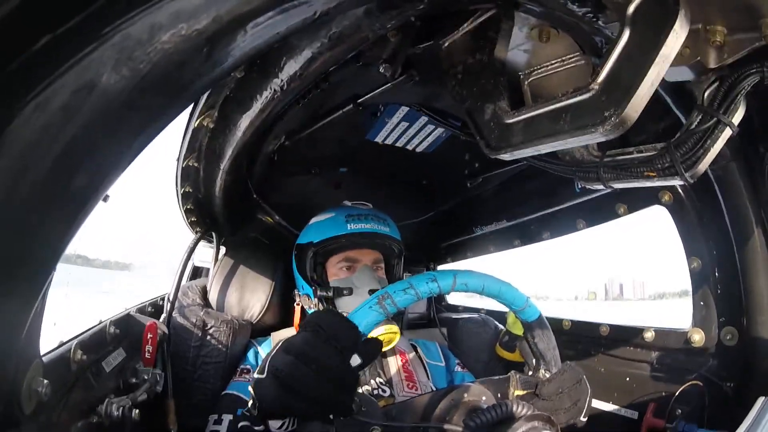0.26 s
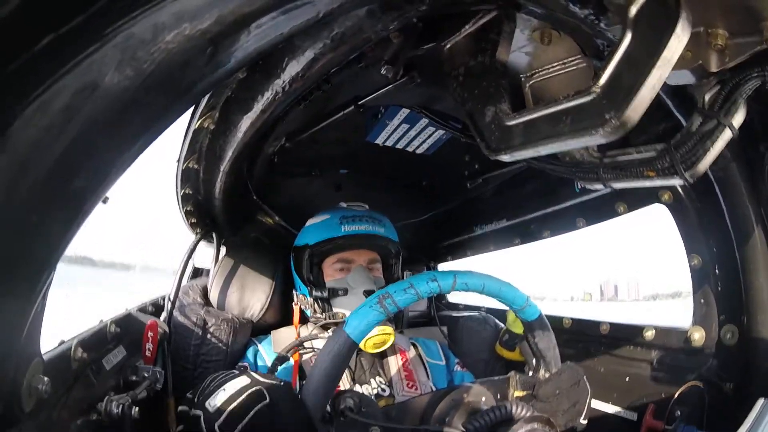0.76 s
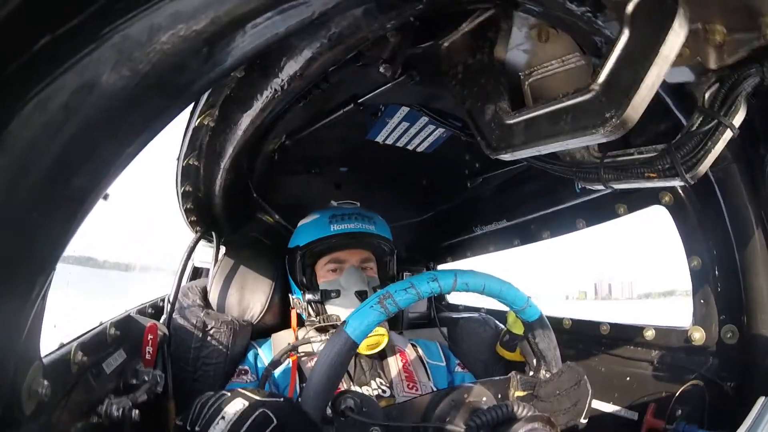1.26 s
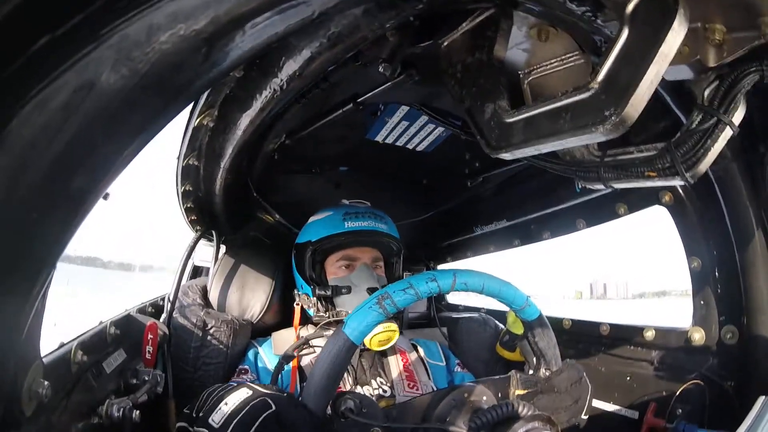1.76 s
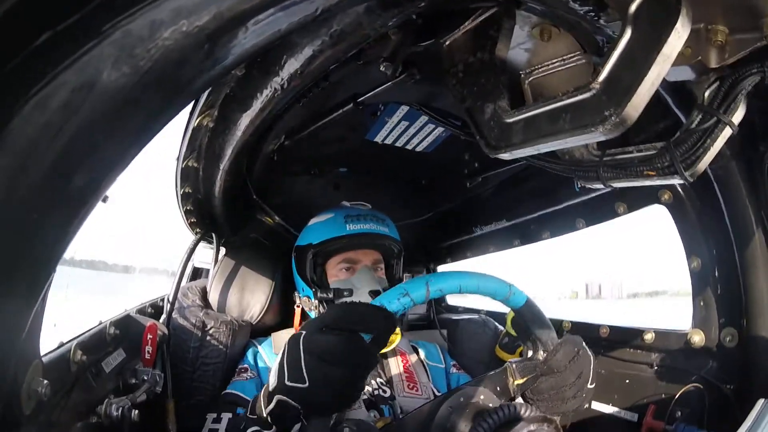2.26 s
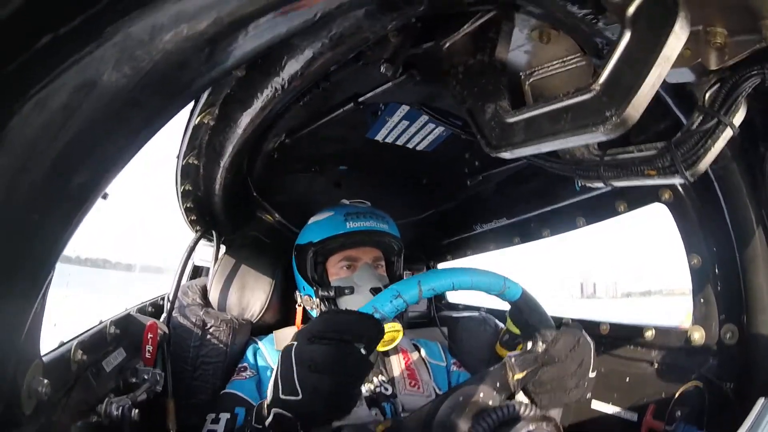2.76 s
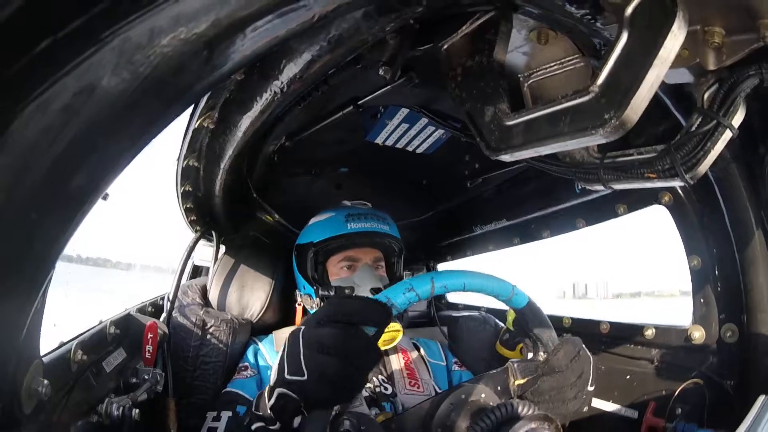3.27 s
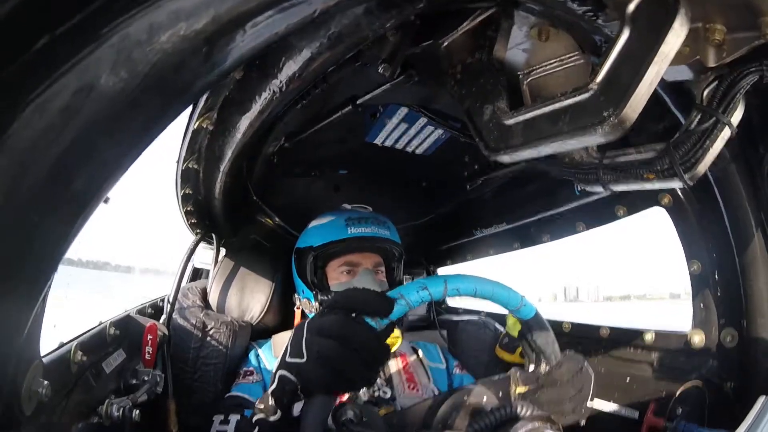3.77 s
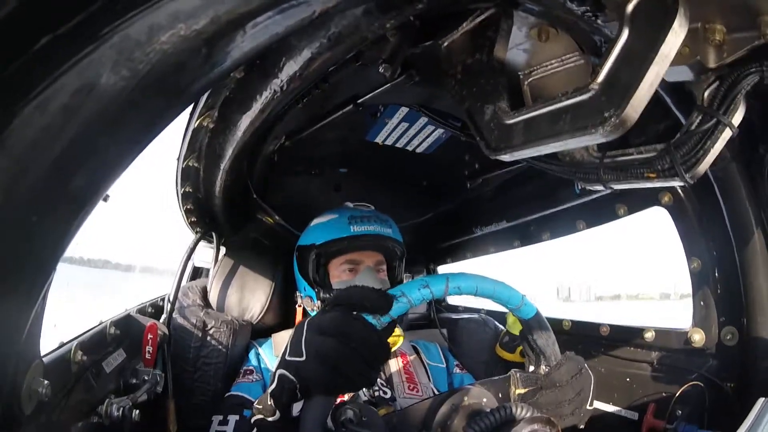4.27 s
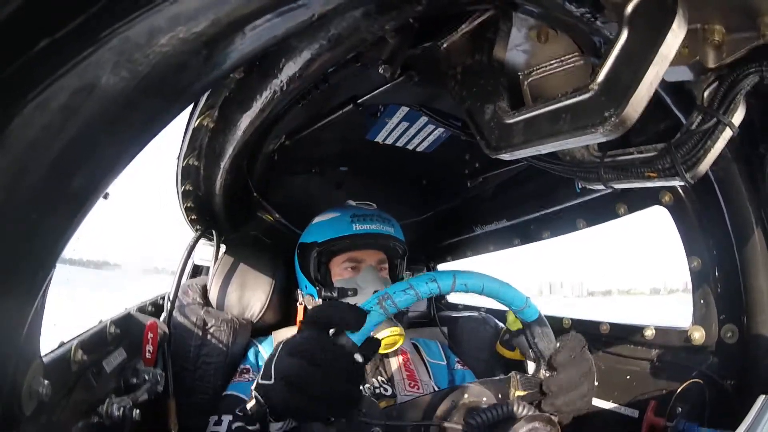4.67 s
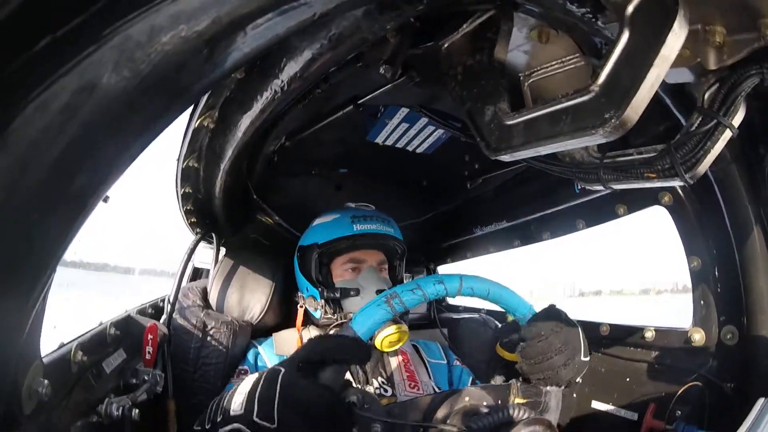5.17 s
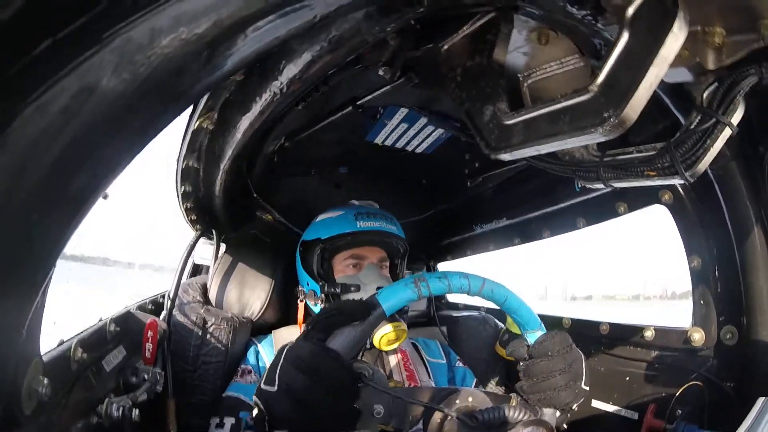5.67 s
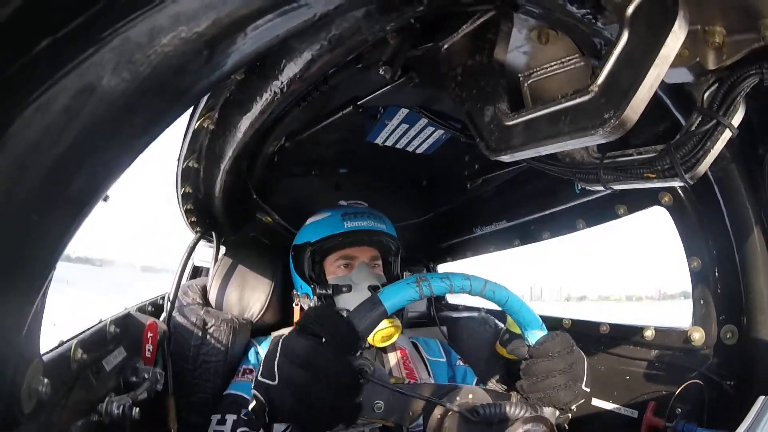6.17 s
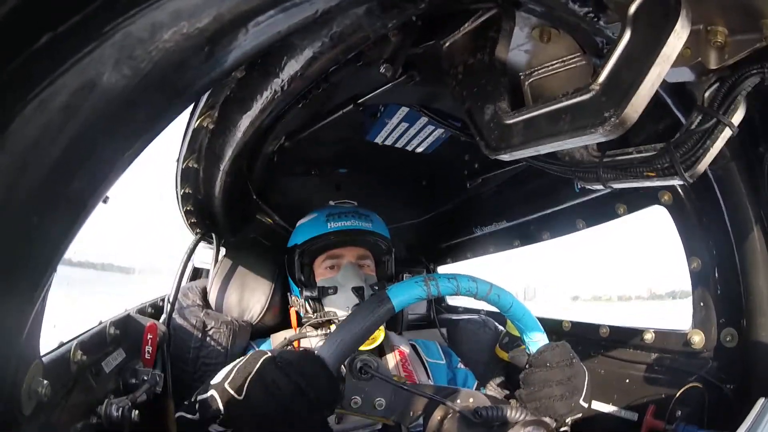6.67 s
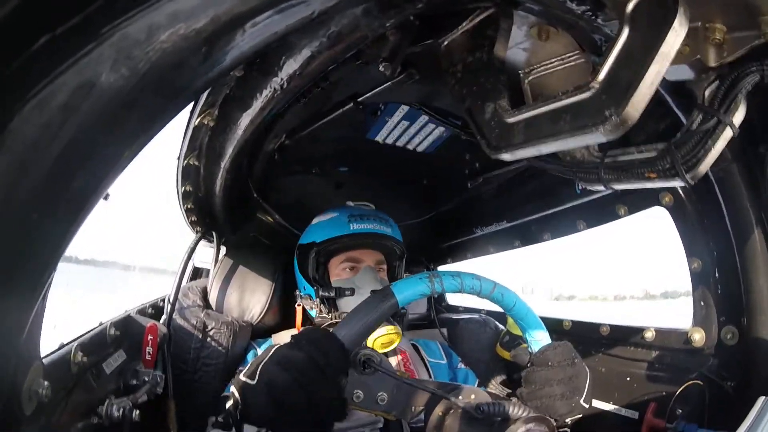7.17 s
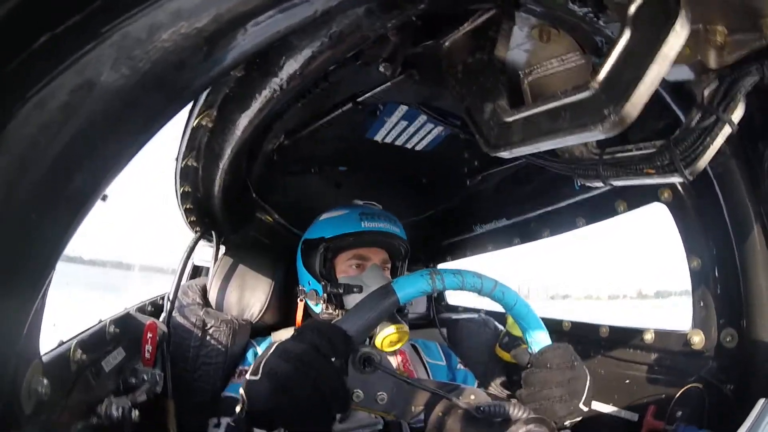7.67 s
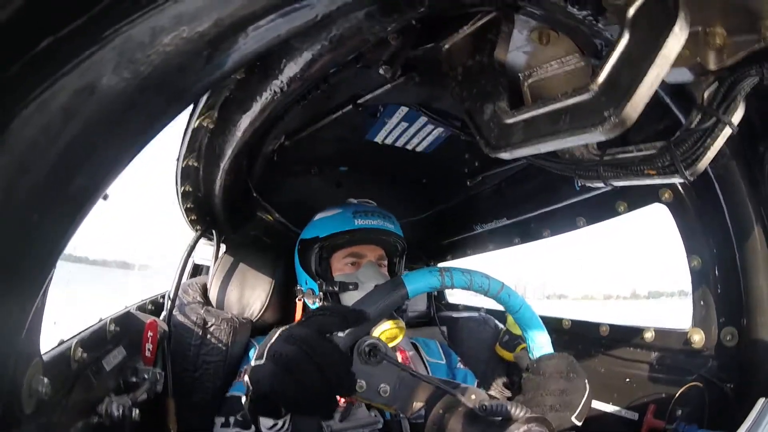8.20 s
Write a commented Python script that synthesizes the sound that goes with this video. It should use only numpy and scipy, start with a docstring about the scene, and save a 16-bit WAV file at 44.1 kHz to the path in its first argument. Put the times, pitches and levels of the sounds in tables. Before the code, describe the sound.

Heard from a microphone fixed inside a small enclosed race boat cockpit, a turbine-driven shaft drones loudly with one strong low hum around 230 hertz. A deep boom swells and eases as waves load the propeller. Water rushes under the hull, loose fittings buzz metallically, and a thin whine sits faintly on top. Irregular dull thuds and spray cracks continue throughout, heaviest near the end.

```python
"""A turbine race boat at steady speed, heard inside its closed cockpit.
From the start: shaft orders drone, with a strong third-order hum; low rumble; water rushing under the hull;
fittings buzzing; thin turbine whine on top. Waves swell the drone throughout.
Wavelets thud from 0.04 s, water sheets surge from 0.14 s, spray cracks on the shell from 0.16 s.
The heaviest thuds come near 6.9 and 7.65 s, the sharpest crack near 7.03 s."""
import sys
import numpy as np
from scipy import signal
from scipy.fft import rfft, irfft
from scipy.io import wavfile
from scipy.ndimage import uniform_filter1d, minimum_filter1d

SR = 44100
rng = np.random.default_rng(int(sys.argv[2]) if len(sys.argv) > 2 else 0)


def log_audio(samples):
    """Write samples as a 16-bit WAV file to the path given in sys.argv[1]."""
    # one column per channel
    frames = np.atleast_2d(samples).T
    # limit to full scale, then quantise
    limited = np.clip(frames, -1, 1)
    pcm = np.round(limited * 32767).astype(np.int16)
    wavfile.write(sys.argv[1], SR, pcm)


N = 372204
T = np.arange(N) / SR

# propeller shaft, third order: t/s, f/Hz
SHAFT_THIRD_ORDER = [(0.1, 232.7), (0.9, 230.9), (0.97, 232.4), (3.73, 232.5), (3.93, 230.6), (4.57, 231.1),
                     (4.73, 229.5), (5.21, 229.3), (5.4, 232.7), (5.6, 229.3), (6.88, 231.2), (7.02, 229.7),
                     (7.48, 229.4), (7.61, 235.0), (7.79, 230.7), (8.3, 231.0)]
# weaker shaft orders: multiple of shaft speed, level/dB
WEAK_ORDERS = [(2, -33.5), (4, -28), (5, -39.5), (9, -43.5), (13, -52)]
# cockpit hum on the third order: t/s, level before HUM_TRIM_DB/dB
HUM_LEVEL = [(0.0, -13), (0.07, -11.5), (0.3, -16), (0.69, -13), (0.88, -22), (0.91, -15.5), (1.58, -13),
             (1.67, -19), (1.74, -12), (2.37, -15.5), (2.65, -13), (3.7, -15), (3.86, -13.5), (3.97, -27),
             (4.07, -16), (4.95, -14), (5.02, -22.5), (5.09, -16.5), (5.28, -21.5), (5.53, -13),
             (5.72, -22), (5.77, -12), (6.3, -18), (7.11, -13), (7.54, -17.5), (7.58, -12.5), (8.28, -15),
             (8.35, -16.5)]
# waves loading the propeller: middle t/s, length/s, boom swell/dB
WAVE_SWELLS = [(.27, 1, 1.5), (0.798, 0.4, 7), (1.112, .2, 6), (1.49, .32, 7), (1.965, 0.22, 6),
               (2.45, 1, 2.5), (3.1, 0.36, 4), (3.482, 0.2, 5.5), (4.12, 0.8, 3.5), (4.683, 0.5, 6),
               (5.1, .52, 6.5), (5.667, 0.31, 5), (6.02, .28, 7), (6.72, 0.23, 5), (7.26, 0.96, 4.5),
               (7.84, 0.45, 7.5), (8.35, .24, 7)]
# low turbulence spectrum: f/Hz, relative level/dB
RUMBLE_SPECTRUM = [(17, 8.5), (26, 6), (34, 3.5), (45, 4), (54, 3.5), (66, 4), (85, 3.5), (102, -10),
                   (130, -7.5), (175, -4.5), (215, -4), (270, -12)]
# rushing water spectrum: f/Hz, relative level/dB
WASH_SPECTRUM = [(200, -10), (260, -0.5), (310, 0), (350, 0.5), (420, -3.5), (500, -9.5), (620, -14),
                 (680, -16.5), (800, -15.5), (950, -21), (1100, -26), (1300, -27.5), (1700, -39)]
# steady spray spectrum: f/Hz, relative level/dB
SPRAY_SPECTRUM = [(800, -10.5), (1200, 7), (1580, -2), (1800, 4), (2100, -1), (2500, -4.5), (2800, -20),
                  (3500, -4), (5000, -24)]
# hull panel resonances: f/Hz, width/Hz, lift/dB
PANEL_MODES = [(560.4, 62, 8), (770, 25, 4.5), (909, 32, 5), (1030, 32, 0.5), (1260, 34, -1),
               (1890, 25, -2), (2050, 49, 5), (2263, 73, 4), (2606, 70, 5.5), (3006, 77, 5)]
# water sheets along the hull: middle t/s, length/s, water surge/dB, fittings level change/dB
WATER_SHEETS = [(.2, 0.12, 2, -1), (.45, 0.14, 0.5, 1.5), (0.684, 0.36, 3, 1), (0.868, 0.2, 6, 2.5),
                (1.357, 0.21, 2.5, 1), (1.61, 0.21, 0.5, 5.5), (1.994, 0.17, 3.5, 3),
                (2.196, 0.14, 2.5, -2.5), (2.547, 0.092, 1, 4.5), (3.365, 0.4, 1.5, 0),
                (3.842, 0.25, 3, -3.5), (4.28, .16, 3, 2.5), (4.548, 0.12, 3, 2), (4.78, 0.39, 3.5, 0),
                (5.063, 0.31, 2.5, 0), (5.45, .08, 0, 5.5), (6.18, 0.075, 5.5, 3), (6.656, 0.13, 4, 2.5),
                (6.933, 0.084, 1, 3.5), (7.132, 0.064, 4, 6), (7.403, 0.29, 0.5, 1), (7.63, 0.2, 1, -1.5),
                (7.96, 0.1, 3, 1), (8.415, .14, 2.5, 4.5)]
# fittings sizzle spectrum: f/Hz, relative level/dB
SIZZLE_SPECTRUM = [(2600, -4), (3200, -4), (4000, -4.5), (4600, -9), (5500, -9.5), (6100, -3), (6800, -3.5),
                   (7600, -8), (8300, -26.5), (9000, -15.5), (10400, -19), (11100, -14.5), (11900, -30.5),
                   (12800, -37)]
# ring of one metal fitting: f/Hz, relative level/dB
RING_SPECTRUM = [(3100, -19), (3550, -11.5), (3920, 0), (4300, -18.5)]
# turbine spool, seventh order: t/s, f/Hz
SPOOL_SEVENTH_ORDER = [(0, 7140), (.85, 7072), (1.4, 7105), (2.1, 7095), (2.8, 7125), (3.3, 7095),
                       (3.8, 7100), (4.2, 7072), (4.6, 7090), (5, 7062), (5.7, 7064), (6.4, 7100),
                       (6.8, 7070), (7.3, 7095), (8.44, 7080)]
# turbine whine: multiple of spool speed, relative level/dB
WHINE_ORDERS = [(7, 2), (9, -12.5), (10, -31), (11, -24), (12, -28.5), (14, -24)]
# wavelets thudding on the hull: t/s, force level before SLAP_DB/dB
WAVELETS = [(0.044, -17), (0.084, -12), (0.881, -10.5), (1.228, -26), (1.496, -16), (1.669, -23),
            (1.874, -13.5), (1.972, -13), (2.347, -13.5), (2.768, -14.5), (2.856, -16), (3.356, -11.5),
            (3.383, -16), (3.608, -26), (3.787, -16), (4.017, -20), (5.323, -17), (5.454, -17),
            (5.605, -20), (6.742, -16), (6.896, -8), (7.437, -16), (7.652, -8), (7.766, -11.5),
            (8.383, -19)]
# thud spectrum through the panels: f/Hz, relative level/dB
THUD_SPECTRUM = [(380, -1), (560, 10), (800, -8), (1000, -7), (1400, -24)]
# spray gouts on the shell: t/s, force level before CRACK_DB/dB
SPRAY_GOUTS = [(0.16, -22), (0.834, -23), (0.881, -28.5), (0.9664, -26), (1.3264, -24), (1.6611, -28),
               (1.9714, -31), (2.5484, -34), (3.3124, -23), (3.3508, -21), (3.5254, -26), (3.7877, -31),
               (4.2901, -27), (4.5186, -24), (4.7584, -22), (4.8474, -25), (5.019, -25), (5.3198, -27),
               (6.8967, -37), (7.027, -20), (7.4395, -26), (7.6514, -37), (8.3823, -29)]
# crack spectrum on the shell: f/Hz, relative level/dB
SHELL_SPECTRUM = [(700, 0), (1250, 3.5), (1600, 0.5), (2100, 3), (2700, -9.5), (3500, -6), (5000, -19)]

# levels before waves, sheets and chop
BOOM_DB, HUM_TRIM_DB, WASH_DB, SPRAY_DB, SHAKE_DB, WHISTLE_DB = -18.35, 0.49, -21.0, -44.0, -45.5, -52.2
# dB per dB of wave swell; the hum gives way while the boom swells
HUM_PER_SWELL, WASH_PER_SWELL, SHAKE_PER_SWELL = -0.28, 0.16, 0.09
# dB per dB of sheet surge
WASH_PER_SURGE, SPRAY_PER_SURGE = 0.59, 0.9
# random chop: pace, rms level change per layer, rms shaft wander
CHOP_HZ, SHAFT_WANDER_HZ = 15, 0.25
HUM_CHOP_DB, WASH_CHOP_DB, SPRAY_CHOP_DB, SHAKE_CHOP_DB, WHISTLE_CHOP_DB = 1.4, 0.37, 1, 1, 2
SLAP_DB, SLAP_DECAY_S = -1, 0.0079
CRACK_DB, CRACK_DECAY_S = -4, 0.0057
SLAP_CRACK_DB = -23  # spray thrown by each wavelet, re its thud force
TOP_HZ = 14400


def undb(db):
    """Decibels to amplitude gain."""
    return 10 ** (np.asarray(db) / 20)


def unit(x):
    """Scale to rms 1."""
    return x / np.sqrt(np.mean(x ** 2))


def curve(table):
    """Second column of a table, linearly interpolated over time."""
    time_s, value = np.transpose(table)
    return np.interp(T, time_s, value)


def walk(rate_hz):
    """Smooth random signal of rms 1, rolled off above rate_hz."""
    f_hz = np.fft.rfftfreq(N, 1 / SR)
    spectrum = rfft(rng.standard_normal(N)) / (1 + (f_hz / rate_hz) ** 2)
    return unit(irfft(spectrum, N))


def colour(x, spectrum, resonances=()):
    """Minimum-phase filter: smooth spectrum plus resonances, 40 dB/octave fall beyond its ends."""
    size = 16384
    f_hz = np.fft.rfftfreq(size, 1 / SR) + 1
    points_hz, points_db = np.transpose(spectrum)
    octaves_outside = np.abs(np.log2(f_hz / np.clip(f_hz, points_hz[0], points_hz[-1])))
    shape_db = np.interp(np.log(f_hz), np.log(points_hz), points_db)
    shape_db = shape_db - 40 * np.minimum(octaves_outside, 2)  # fall stops after 2 octaves
    for centre_hz, width_hz, lift_db in resonances:
        shape_db = shape_db + lift_db / (1 + (2 * (f_hz - centre_hz) / width_hz) ** 2)
    # folded cepstrum makes the response causal
    cepstrum = irfft(np.log(undb(shape_db)))
    cepstrum[1:size // 2] *= 2
    cepstrum[size // 2 + 1:] = 0
    response = irfft(np.exp(rfft(cepstrum)))
    return signal.fftconvolve(x, response)[:N]


def grains(spread_db, grain_hz):
    """Dense small impacts: noise of randomly jumping strength."""
    return unit(rng.standard_normal(N) * undb(spread_db * walk(grain_hz)))


def arches(middles_s, lengths_s, heights_db):
    """Sum of half-sine rises and falls, in dB."""
    total_db = 0
    for middle_s, length_s, height_db in zip(middles_s, lengths_s, heights_db):
        phase = np.clip((T - middle_s) / length_s, -0.5, 0.5)
        total_db = total_db + height_db * np.cos(np.pi * phase)
    return total_db


def drone(shaft_angle, boom_db, hum_db, lag_rad=1.0):
    """Shaft orders shake the cockpit; uneven propeller load flutters each in level and phase."""
    boom_phase = shaft_angle - lag_rad + 0.14 * walk(5)
    boom = undb(boom_db + 0.5 * walk(10)) * np.cos(boom_phase)
    hum_phase = 3 * shaft_angle - lag_rad + 0.11 * walk(20)
    hum = undb(hum_db + 1.4 * walk(22)) * np.cos(hum_phase)
    rest = 0
    for multiple, level_db in WEAK_ORDERS:
        phase = multiple * shaft_angle + 0.55 * walk(8)
        rest = rest + undb(level_db + 3 * walk(6)) * np.cos(phase)
    return np.sqrt(2) * (boom + hum + undb(-0.1) * rest)


def rumble():
    """Turbulence under the hull fills the cockpit with low noise."""
    return undb(-20.5) * unit(colour(rng.standard_normal(N), RUMBLE_SPECTRUM))


def splashes(per_s=28, decay_s=0.0059, size=0.87):
    """Random small splashes: instant onset, exponential decay, on a steady level of 1."""
    starts = rng.random(N) < per_s / SR
    hits = starts * np.minimum(rng.exponential(0.8, N), 2.2)
    return 1 + size * signal.lfilter([1], [1, -np.exp(-1 / (decay_s * SR))], hits)


def water(shaft_angle, wash_db, spray_db):
    """Rushing water and spray drive the panels, surging twice a turn as the blades bite."""
    bite = 1 + 0.22 * np.cos(2 * shaft_angle + 0.21 * walk(5.7))
    churn = grains(1.1, 70)
    droplets = grains(2.2, 1200)
    splash = splashes()
    wash = unit(colour(churn * bite * splash ** 0.3, WASH_SPECTRUM, PANEL_MODES))
    spray = unit(colour(droplets * bite * splash, SPRAY_SPECTRUM, PANEL_MODES))
    return undb(wash_db) * wash + undb(spray_db) * spray


def fittings(shake_db, chatter_hz=73, bounce_hz=137):
    """Loose fittings chatter at two wandering rates: bright sizzle plus one metallic ring."""
    contact_drive = 0
    for rate_hz in (chatter_hz, bounce_hz):
        wandering_hz = rate_hz * (1 + 0.14 * walk(14.53))
        contact_drive = contact_drive + np.cos(2 * np.pi * np.cumsum(wandering_hz) / SR)
    contact = np.exp(0.6 * contact_drive)
    sizzle = unit(colour(grains(0.75, 400) * (1 + 0.22 * contact), SIZZLE_SPECTRUM, PANEL_MODES))
    ring = unit(colour(grains(3.5, 250) * contact, RING_SPECTRUM))
    buzz = undb(-3.0) * sizzle + undb(-10.0 + 3.4 * walk(13)) * ring
    return undb(shake_db + 1.4 * walk(35)) * buzz


def turbine(whistle_db):
    """Spool orders, smeared into narrow whistling bands by turbulent intake air."""
    seventh_hz = curve(SPOOL_SEVENTH_ORDER) + 10 * walk(30)
    spool_angle = 2 * np.pi * np.cumsum(seventh_hz / 7) / SR
    whine = 0
    for multiple, level_db in WHINE_ORDERS:
        flutter = 1 + 0.62 * (walk(42) + 1j * walk(42))
        band = np.real(flutter * np.exp(1j * multiple * spool_angle))
        whine = whine + undb(level_db) * unit(band)
    return undb(whistle_db) * whine


def blows(events, decay_s, rise_s=0.00053):
    """Impact forces: fast rise, exponential decay."""
    force, age_s = np.zeros(N + SR), T[:SR // 8]
    for time_s, level_db in events:
        start = max(int(time_s * SR), 0)
        pulse = (1 - np.exp(-age_s / rise_s)) * np.exp(-age_s / decay_s)
        force[start:start + len(age_s)] += undb(level_db) * pulse
    return force[:N]


def slaps():
    """Wavelets thud dully through the panels; spray gouts crack on the shell as drop clusters."""
    thud_force = blows(WAVELETS, SLAP_DECAY_S)
    gout_force = blows(SPRAY_GOUTS, CRACK_DECAY_S)
    crack_force = undb(CRACK_DB) * gout_force + undb(SLAP_CRACK_DB) * thud_force
    thuds = thud_force * unit(colour(rng.standard_normal(N), THUD_SPECTRUM, PANEL_MODES))
    cracks = crack_force * unit(colour(grains(3.5, 900), SHELL_SPECTRUM, PANEL_MODES))
    return undb(SLAP_DB) * thuds + cracks


def scene():
    """Waves load the propeller, sheets surge the water and alter the buzz, chop unsettles the levels."""
    swell_db = arches(*np.transpose(WAVE_SWELLS))
    middles_s, lengths_s, surges_db, rattles_db = np.transpose(WATER_SHEETS)
    surge_db = arches(middles_s, lengths_s, surges_db)
    rattle_db = arches(middles_s, lengths_s, rattles_db)
    water_chop = walk(CHOP_HZ)  # shared by wash and spray

    boom_db = BOOM_DB + swell_db
    hum_db = curve(HUM_LEVEL) + HUM_TRIM_DB + HUM_PER_SWELL * swell_db + HUM_CHOP_DB * walk(CHOP_HZ)
    wash_db = WASH_DB + WASH_PER_SWELL * swell_db + WASH_PER_SURGE * surge_db + WASH_CHOP_DB * water_chop
    spray_db = SPRAY_DB + SPRAY_PER_SURGE * surge_db + SPRAY_CHOP_DB * water_chop
    shake_db = SHAKE_DB + SHAKE_PER_SWELL * swell_db + rattle_db + SHAKE_CHOP_DB * walk(CHOP_HZ)
    whistle_db = WHISTLE_DB + WHISTLE_CHOP_DB * walk(CHOP_HZ)

    shaft_hz = curve(SHAFT_THIRD_ORDER) / 3 + SHAFT_WANDER_HZ * walk(CHOP_HZ)
    shaft_angle = 2 * np.pi * np.cumsum(shaft_hz) / SR
    hull = drone(shaft_angle, boom_db, hum_db) + rumble() + water(shaft_angle, wash_db, spray_db)
    mix = hull + fittings(shake_db) + turbine(whistle_db) + slaps()
    return mix[None]


def record(dry):
    """Gain eases down around peaks above 0.86; 4 ms end fades; steep low-pass at TOP_HZ."""
    gain = np.minimum(1, 0.86 / (np.abs(dry) + 1e-9))
    gain = uniform_filter1d(minimum_filter1d(gain, size=441), size=441)  # 10 ms windows
    fade = np.minimum(np.minimum(T, T[-1] - T) / 0.004, 1)
    low_pass = signal.ellip(8, 0.2, 70, TOP_HZ, fs=SR, output="sos")
    return signal.sosfilt(low_pass, dry * gain * fade)


dry = scene()
out = record(dry)
log_audio(out)
```